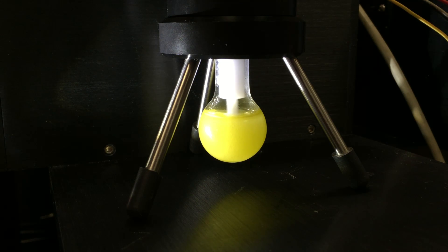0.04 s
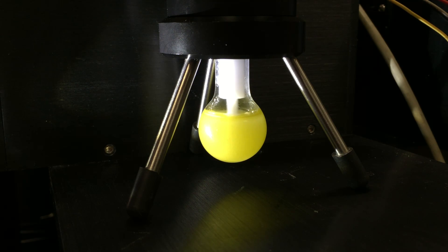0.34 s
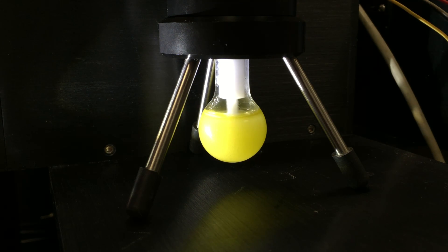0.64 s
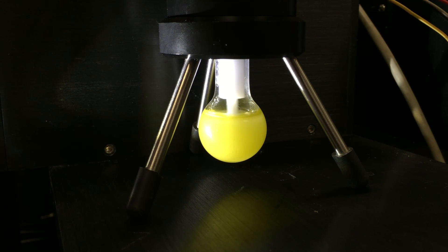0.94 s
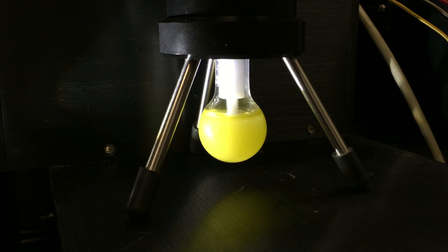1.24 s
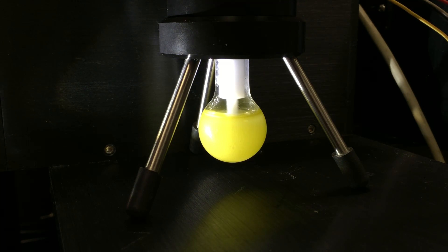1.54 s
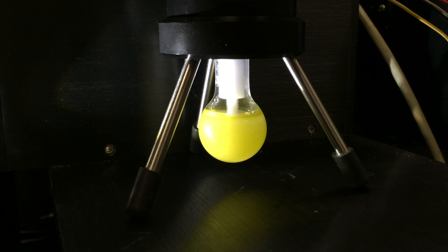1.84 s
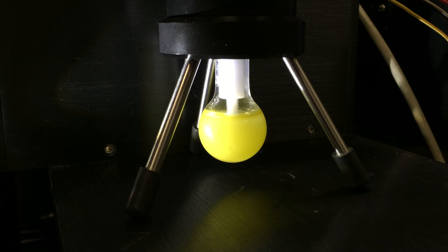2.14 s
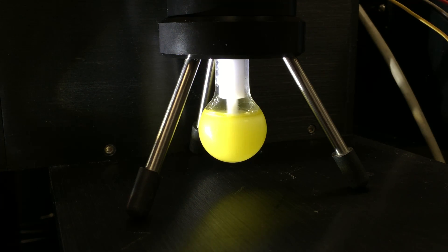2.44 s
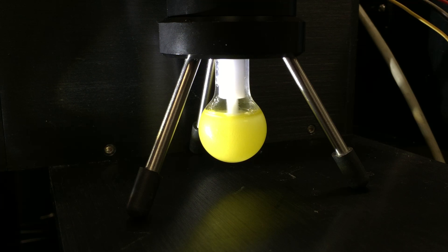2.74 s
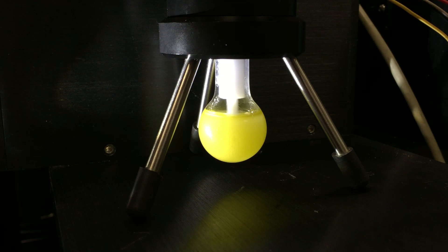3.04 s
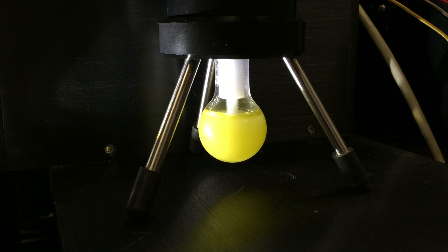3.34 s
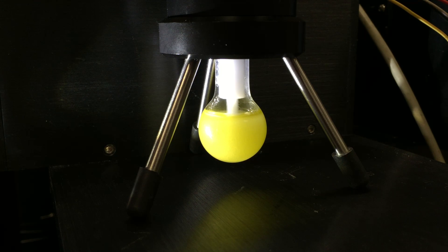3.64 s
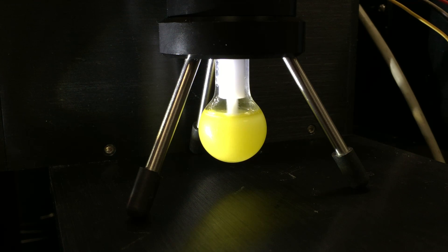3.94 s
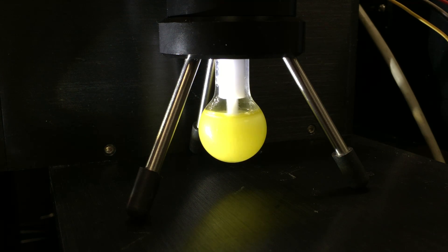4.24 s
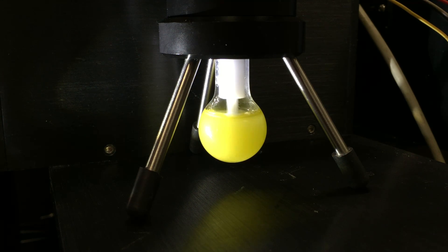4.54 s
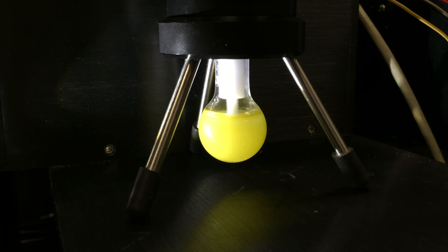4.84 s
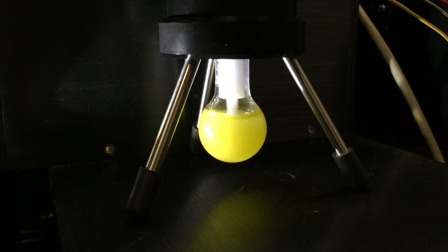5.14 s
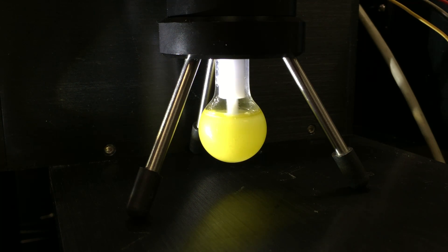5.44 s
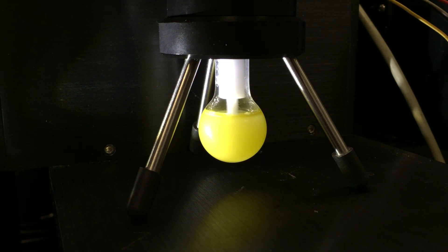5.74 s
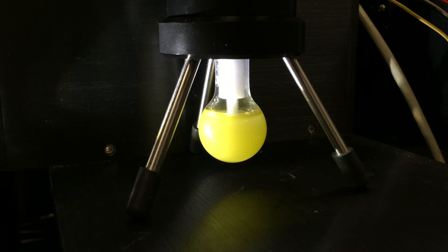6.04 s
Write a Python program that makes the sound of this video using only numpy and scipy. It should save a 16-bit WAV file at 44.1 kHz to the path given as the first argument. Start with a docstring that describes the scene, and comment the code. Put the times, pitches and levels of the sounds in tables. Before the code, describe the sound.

Laboratory fans and pumps make a constant low drone with a light rush of air. In front, near the microphone, a stirrer hums and rattles against its stand and a small flask, with a faint high sizzle. It opens with a hard, clattering buzz, then settles into repeated bright pulses, roughly two a second. The later pulses grow stronger, with brief returns of the clatter and a soft rub.

```python
"""Fans and pumps drone throughout, behind a mains-driven lab stirrer close by in a small flask on a tripod.
From the start its drive hums, sizzles thinly and knocks the stand once per mains cycle, while a loose
contact, pressed hard, ticks and clatters. The ticking then swells and slips free about twice a second.
From 4.5 s the clatter returns in three short spells, with one soft scuff near 5.2 s."""
import sys
import numpy as np
from scipy import signal
from scipy.fft import rfft, irfft, next_fast_len
from scipy.io import wavfile
from scipy.ndimage import map_coordinates

SR = 44100
rng = np.random.default_rng(int(sys.argv[2]) if len(sys.argv) > 2 else 0)


def store_wav(level_fs):
    """Save 16-bit WAV to argv[1]."""
    pcm = np.round(np.clip(np.atleast_2d(level_fs), -1, 1) * 32767)
    wavfile.write(sys.argv[1], SR, pcm.T.astype(np.int16))


N = 268128
MAINS_HZ, FIRST_KNOCK_S = 50.0055, .0112
FIRM_DB = -56  # level of a firmly pressed contact


def amp(db):
    """Decibels to gain."""
    return 10 ** (np.asarray(db) / 20)


def unit(x):
    """Scale to rms 1."""
    return x / np.sqrt(np.mean(x ** 2) + 1e-20)


def wobble(rate, size=4000):
    """A smooth random curve, rate knots a second."""
    at = np.linspace(0, N, size)
    coarse = map_coordinates(rng.standard_normal(int(N * rate / SR) + 4), [at * rate / SR])
    return np.interp(np.arange(N), at, coarse)


def filtered(x, response):
    """Shape x with a gain given as a function of frequency."""
    size = next_fast_len(N + SR // 2)
    return irfft(rfft(x, size) * response(np.fft.rfftfreq(size, 1 / SR)), size)[:N]


def coloured(x, points):
    """x through an EQ curve of (pitch_hz, gain_db) points, at rms 1."""
    pitch_hz, gain_db = np.transpose(points)
    return unit(filtered(x, lambda hz: amp(np.interp(np.log(hz + 1), np.log(pitch_hz), gain_db))))


def ring(modes, size=8192):
    """Causal impulse response of a body with steep resonances, energy 1."""
    hz = np.fft.rfftfreq(size, 1 / SR)
    power = sum((amp(db) / (1 + (2 * (hz - pitch) / width) ** 2)) ** 2 for pitch, width, db in modes)
    cepstrum = irfft(np.log(power) / 2)
    cepstrum[1:size // 2] *= 2  # minimum phase: nothing rings before the blow
    cepstrum[size // 2:] = 0
    response = irfft(np.exp(rfft(cepstrum)))[:size // 2]
    return response / np.linalg.norm(response)


def blows(times, sizes, order=8):
    """Impulses placed between samples; size 1 at the mains rate gives rms 1."""
    at = times[:, None] * SR
    taps = np.floor(at).astype(int) + np.arange(1 - order, order + 1)
    shape = np.sinc(taps - at) * np.sinc((taps - at) / order)
    train = np.bincount(np.clip(taps, 0, N).ravel(), (sizes[:, None] * shape).ravel(), N + 1)
    return train[:N] * np.sqrt(SR / MAINS_HZ)


def struck(modes, level_db, scatter_db, jitter_us, bounce_db, bounce_ms):
    """One blow per mains cycle, and a small bounce whose delay wanders, ring a body."""
    times = np.arange(FIRST_KNOCK_S, N / SR, 1 / MAINS_HZ)
    at = (times * SR).astype(int)
    size, slip, rebound = rng.standard_normal((len(times), 3)).T
    force = amp(level_db[at] + scatter_db * size)
    delay_s = np.exp(0.23 * wobble(4)[at]) * bounce_ms / 1000
    times = times + slip * jitter_us / 10 ** 6
    train = blows(times, force) + blows(times + delay_s, force * amp(bounce_db + 2 * rebound))
    return signal.fftconvolve(train, ring(modes))[:N]


def enclosure(x, wet_db, t60_s):
    """Nearby walls and the bench answer with a short dense tail."""
    t = np.arange(SR // 4) / SR
    tail = rng.standard_normal(len(t)) * amp(-60 * t / t60_s) * (t > .001)
    return x + amp(wet_db) * signal.fftconvolve(x, tail / np.linalg.norm(tail))[:N]


def equipment():
    """The bed: fan and pump tones, narrow ones steady and wide ones fluttering, over rushing air."""
    # drone of the fans and pumps: pitch_hz, width_hz, level_db
    fan_tones = [(58.4, 3, -57.5), (76, 5, -61.5), (94, 6, -58.5), (117.2, 8, -51), (246, 1.148, -47.5),
                 (260.4, 6, -54), (280, 11, -55.5), (285.1, 7, -48), (590.6, 1.99, -68), (892, 1, -60.5)]
    # low rumble of their air: pitch_hz, gain_db
    rumble_eq = [(20, -40), (42, -28), (55, -13), (105, -8.5), (135, 1), (155, -0.5), (172, 1), (212, 0),
                 (238, -3.5), (295, -2.5), (325, -10), (370, -14), (435, -8), (520, -14.5), (700, -48.5)]
    # its lighter rush: pitch_hz, gain_db
    air_eq = [(350, -14.5), (560, 2), (700, 5.5), (900, -2), (1150, 4), (1350, -5.5), (1550, -8.5),
              (1780, -5.5), (2550, -14), (3400, -10.5), (4200, -18.5), (7000, -26), (11000, -52),
              (15500, -39)]
    t = np.arange(N) / SR
    drone = np.zeros(N)
    for hz, width, db in fan_tones:
        flutter = 5 / width ** 2 + wobble(2 * width) + 1j * wobble(2 * width)
        drone += amp(db) * unit(np.real(flutter * np.exp(2j * np.pi * (hz * t + rng.random()))))
    rumble = amp(-44) * coloured(rng.standard_normal(N), rumble_eq)
    air = amp(-52.5 + .6 * wobble(6)) * coloured(rng.standard_normal(N), air_eq)
    return drone + rumble + air


def sizzle(count=90):
    """Tiny electrical snaps recur at the same points of every mains cycle, under a thin whine."""
    # colour of the snaps: pitch_hz, gain_db
    snap_eq = [(3000, -16), (6000, 8), (7400, -31), (8000, 0), (9500, -10), (10900, 19.5), (11800, -34),
               (13300, -32), (14500, -7), (15600, 10.5)]
    # whine of the drive: pitch_hz, relative_db
    whine_tones = [(10503, -95), (10950, -80), (11003, -87), (12349, -90), (14201, -82), (14400, -81),
                   (14702, -83), (14853, -77), (15353, -80)]
    cycles = np.arange(0, N / SR, 1 / MAINS_HZ)
    offsets, sizes = rng.random(count) / MAINS_HZ, rng.standard_normal(count)
    snaps = blows((cycles[:, None] + offsets).ravel(), np.tile(sizes, len(cycles)))
    t = np.arange(N) / SR
    whine = sum(amp(db + wobble(6)) * np.sqrt(2) * np.cos(2 * np.pi * (hz * t + rng.random()))
                for hz, db in whine_tones)
    return amp(-73) * coloured(snaps, snap_eq) + amp(-3) * whine


def hum(smear_rad=0.121, lag_s=.003):
    """The magnetic pull peaks twice a cycle: odd and even harmonics lie a quarter turn apart."""
    # hum of the drive: mains_multiple, relative_db
    harmonics = [(8, -16), (9, -9.5), (10, -20), (11, -16.5), (12, -9), (13, -17), (14, 3.5), (15, -1.5),
                 (16, -2), (17, -3), (18, -13.5), (19, -10.5), (20, -16.5), (21, -9), (22, -10.5),
                 (24, -12)]
    turn = 2 * np.pi * MAINS_HZ * (np.arange(N) / SR - FIRST_KNOCK_S - lag_s)
    tones = np.zeros(N)
    for multiple, db in harmonics:
        spread = smear_rad * (multiple - 15) ** 2  # the stand spreads each pull out in time
        phase = multiple * turn + multiple % 2 * np.pi / 2 + spread
        tones += amp(db + .5 * wobble(5)) * np.cos(phase)
    return amp(-47.5) * unit(tones)


def pressure(touch_s=.04, growth_db=21.5, free_db=-83, waver_db=0.54):
    """Level of the loose contact in dB: each swell grows ever more slowly, then dies as it slips free."""
    # swells of the contact: start_s, rise_s, slip_s, release_t60_s, level_db
    swells = [(-0.4, 0.4, 0.43, 0.066, -49.1), (0.471, 0.2, 0.837, 0.516, -56.6),
              (0.951, 0.294, 1.17, 0.157, -58.4), (1.158, 0.292, 1.606, 0.188, -54.8),
              (1.663, 0.487, 2.14, 0.327, -51.7), (2.257, 0.298, 2.767, 0.067, -53.3),
              (2.789, 0.398, 3.246, 0.57, -52.6), (3.18, 0.388, 3.674, 0.52, -53.1),
              (3.774, 0.321, 4.187, 0.359, -50.9), (4.207, 0.318, 4.639, 0.219, -50.3),
              (4.642, 0.402, 5.142, 0.351, -49.3), (5.218, 0.469, 5.559, 0.749, -48.6),
              (5.657, 0.327, 6.027, 0.282, -49.6)]
    t = np.arange(N) / SR
    power = amp(free_db) ** 2
    for start, rise, slip, release, db in swells:
        touch = np.clip((t - start) / touch_s, 0, 1)
        to_go = 1 - np.clip((t - start) / rise, 0, 1)
        fall_db = 60 * np.maximum(t - slip, 0) / release
        power = power + (touch * amp(db - growth_db * to_go ** 2 - fall_db)) ** 2
    return 10 * np.log10(power) + waver_db * wobble(14)


def crackle(contact_db, count=130):
    """Faint stray ticks fall between the regular ones, louder while the contact presses."""
    times = rng.random(count) * N / SR
    sizes = amp(2 * rng.standard_normal(count) + contact_db[(times * SR).astype(int)] / 2)
    return amp(-75) * coloured(blows(times, sizes), [(1500, -15), (3500, -4), (8000, 2), (15000, -7)])


def scuff(peak_s=5.17, half_width_s=0.048):
    """A short soft rub as the contact slips free."""
    swell = np.exp(-((np.arange(N) / SR - peak_s) / half_width_s) ** 2)
    rub_eq = [(400, -15), (900, -1), (1400, 4), (2200, -10), (4000, -13), (10000, -28)]
    return amp(-51) * swell * coloured(rng.standard_normal(N), rub_eq)


def grit(contact_db, lead_s=0.00065, decay_s=.0028):
    """Each touch of the contact also scrapes: a tiny burst of fresh noise."""
    age_s = (np.arange(N) / SR - FIRST_KNOCK_S + lead_s) % (1 / MAINS_HZ)
    bursts = np.exp(-age_s / decay_s) * amp(2.9 * wobble(30)) * rng.standard_normal(N)
    scrape_eq = [(1000, -20), (1800, -14), (3000, 12), (5500, 5.5), (7400, 10), (9000, -9),
                 (12000, 2.5), (14500, 1), (15800, -6.5)]
    return amp(contact_db - 9.5) * coloured(bursts, scrape_eq)


def clatter(lag_s=0.00158, scatter_db=1.7, jitter_s=.00003):
    """In spells of hard contact a duller second blow follows each tick."""
    # spells when the contact is pressed hard: start_s, end_s, level_db
    spells = [(0, .44, -59.5), (4.52, 4.64, -59), (4.92, 5.165, -59.5), (5.86, 6.02, -58.5)]
    # resonances that the clatter stirs: pitch_hz, width_hz, relative_db
    clamp_modes = [(1230, 240, -2), (1870, 290, 9.5), (2397, 190, 4.5), (3150, 300, -5), (3700, 400, -28),
                   (4470, 530, -2.5)]
    times = np.arange(FIRST_KNOCK_S, N / SR, 1 / MAINS_HZ)
    size, slip = rng.standard_normal((len(times), 2)).T
    force = sum(amp(db) * (times > start) * (times < end) for start, end, db in spells)
    train = blows(times + lag_s + jitter_s * slip, force * amp(scatter_db * size))
    return enclosure(signal.fftconvolve(train, ring(clamp_modes))[:N], wet_db=-11, t60_s=0.1)


def knock(contact_db, lead_s=0.00022):
    """The drive strikes the stand just ahead of each tick, a little harder as the contact presses."""
    # resonances of the stand: pitch_hz, width_hz, relative_db
    stand_modes = [(1277, 250, 6), (1470, 110, -1), (1733, 130, 4.5), (1913, 220, 1), (2113, 195, 1),
                   (2330, 98, 3), (2750, 240, -7.5), (2947, 234, 2.5), (3540, 78, -6), (3580, 255, 3),
                   (3695, 125, 4)]
    level_db = -55.5 + 0.14 * (contact_db - FIRM_DB)
    knocks = struck(stand_modes, level_db, scatter_db=1.16, jitter_us=4.2,
                    bounce_db=-11.5, bounce_ms=1.21)
    early = filtered(knocks, lambda hz: np.exp(2j * np.pi * hz * lead_s))
    return enclosure(early, wet_db=-15.5, t60_s=0.081)


def tick(contact_db, shimmer_db=0.8, wall_s=.0072, wall_db=-24):
    """The loose contact rings the glass in a bright buzz; a harder touch rings the high modes more."""
    # resonances of the contact and the glass: pitch_hz, width_hz, relative_db
    glass_modes = [(1900, 220, -17.5), (3660, 660, -10), (4310, 330, -8), (4770, 380, -7.5), (5223, 270, 1),
                   (5470, 600, -1.5), (5800, 390, 2), (6320, 350, 0), (6810, 260, -6.5), (7000, 240, -7.5),
                   (7936, 182, 0), (8634, 410, -6), (9280, 170, -14), (9860, 400, -18), (10740, 600, -21),
                   (12700, 830, -32), (14500, 1200, -23)]
    ticks = struck(glass_modes, contact_db + 0.34, scatter_db=0.97, jitter_us=6.7,
                   bounce_db=-13.5, bounce_ms=0.403)
    treble = filtered(ticks, lambda hz: 1 / (1 + (7400 / (hz + 1)) ** 20))
    lift_db = 1.6 + 0.058 * (contact_db - FIRM_DB) + shimmer_db * wobble(8.5)
    bright = ticks + treble * (amp(lift_db) - 1)
    with_echo = filtered(bright, lambda hz: 1 + amp(wall_db) * np.exp(-2j * np.pi * hz * wall_s))
    return enclosure(with_echo, wet_db=-11, t60_s=0.032)


def scene():
    """The stirrer in front of the droning equipment, in mono."""
    contact_db = pressure()
    buzz = knock(contact_db) + tick(contact_db)
    rattle = grit(contact_db) + crackle(contact_db) + clatter()
    stirrer = buzz + rattle + hum() + sizzle() + scuff()
    return (stirrer + equipment())[None]


def record(dry):
    """A brick-wall low-pass takes off the very top."""
    return filtered(dry[0], lambda hz: hz < 15870)[None]


dry = scene()
out = record(dry)
store_wav(out)
```